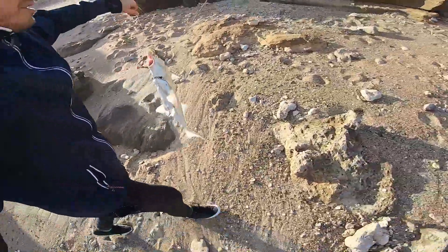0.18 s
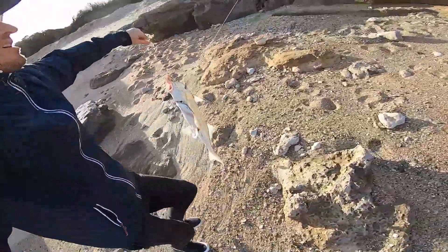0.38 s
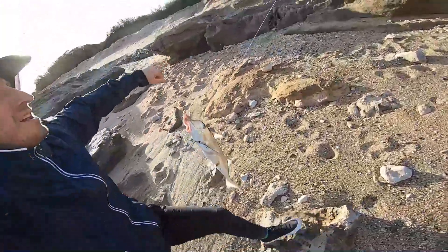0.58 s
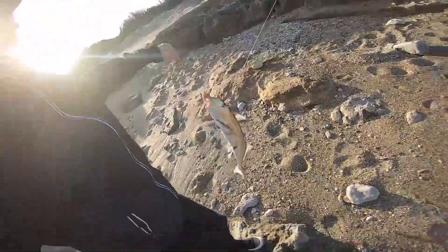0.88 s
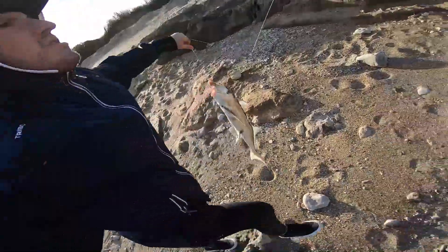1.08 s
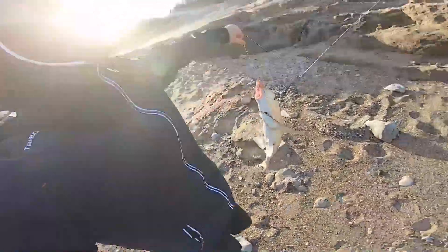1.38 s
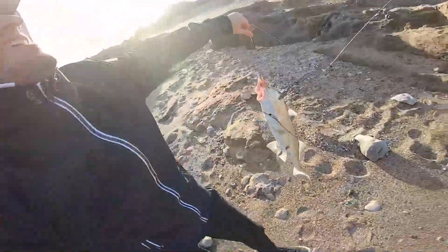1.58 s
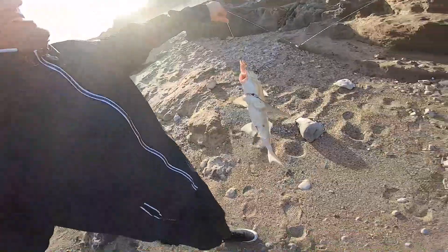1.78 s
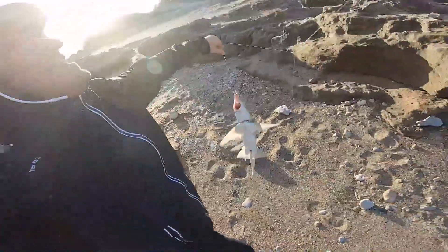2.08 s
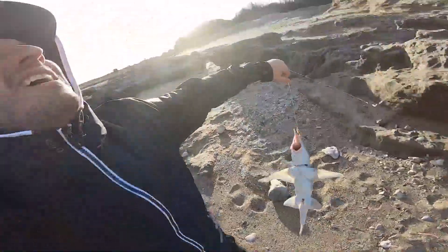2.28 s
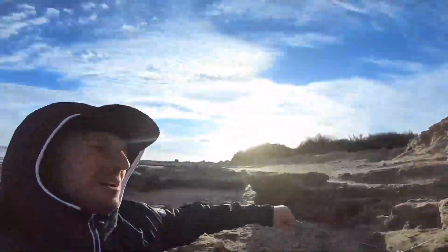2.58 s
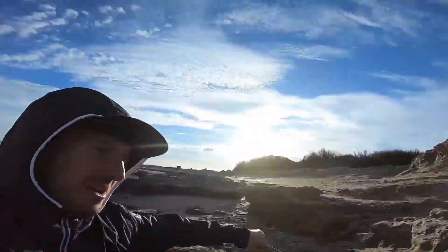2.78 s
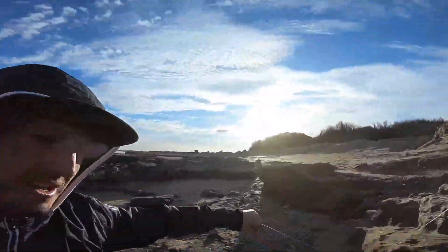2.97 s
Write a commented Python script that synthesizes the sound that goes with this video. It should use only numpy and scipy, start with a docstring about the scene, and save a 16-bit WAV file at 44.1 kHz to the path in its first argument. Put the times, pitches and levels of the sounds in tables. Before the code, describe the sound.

Close, boxy handling knocks and deep thumps of a camera on a pole dominate, mono and slightly overloaded. A wind buffet opens; from 0.2 s knocks and rubbing build to a heavy boom at 0.8. It eases around 1.0-1.5, then a dense, loud cluster rattles at 1.55-2.15 with brief gravel crunches. More clunks follow at 2.4-2.8, with a gust near 2.8, then a faint low ring fades into weak wind and surf hiss.

```python
"""Knocks and thumps travel through the casing and pole of a small camera that a walker holds in gusty wind.
Knocks drive the casing's resonances with short noise bursts; thumps are decaying low tones of the pole.
Wind is patchy low noise over a rumble; the rubbing grip and the gravel are grain trains that ring resonances.
Bright ticks give the treble edge of handling knocks, distant surf hisses as faint noise and a low ring
lingers near the end."""
import sys
import numpy as np
from scipy import signal
from scipy.io import wavfile

SR = 44100
rng = np.random.default_rng(int(sys.argv[2]) if len(sys.argv) > 2 else 0)


def put_to_file(sound):
    """Save the sound as 16-bit audio at rate SR, in the file named by the first command-line argument."""
    columns = np.atleast_2d(sound).T  # one column per channel
    safe = np.clip(columns, -1, 1)
    whole_steps = np.round(safe * 32767)
    wavfile.write(sys.argv[1], SR, whole_steps.astype(np.int16))


N = 138915

# Resonant modes of the casing. Each row: frequency in Hz, bandwidth in Hz, relative level in dB.
CASING = [(425.4, 38, 2.5), (673, 78, 0.5), (837, 77, 2), (959, 89.5, 1), (1200, 105, -3), (1442, 46, -6),
          (1630, 46, -8), (1952, 173, -12.5), (2210, 490, -24.5), (3100, 30, -22.5), (3950, 27, -21.5),
          (4790, 97, -24)]


def from_db(db):
    """Amplitude ratio: 20 dB is a factor of ten."""
    return 10 ** (np.asarray(db) / 20)


def rms_one(x):
    """Normalisation: scale a signal to unit rms."""
    return x / np.sqrt(np.mean(x ** 2) + 1e-20)


def in_time(rows):
    """Envelope: linear interpolation of (seconds, value) rows at every sample."""
    return np.interp(np.arange(N) / SR, *np.transpose(rows))


def drift(rate_hz):
    """Low-passed noise: two equal poles at rate_hz give a slow random curve of unit rms."""
    step = 40  # computed at every 40th sample, then interpolated
    settling = 2000
    pole = np.exp(-2 * np.pi * rate_hz * step / SR)
    noise = rng.standard_normal(N // step + settling + 2)
    slow = signal.lfilter([1], [1, -2 * pole, pole * pole], noise)[settling:]
    return np.interp(np.arange(N) / step, np.arange(len(slow)), rms_one(slow))


def band_pass(x, low_hz, high_hz):
    """Band limiting: a Butterworth filter passes one range of frequencies."""
    return signal.sosfilt(signal.butter(2, [low_hz, high_hz], "band", fs=SR, output="sos"), x)


def coloured(sources, spectrum, patchy_db):
    """Spectral shaping: bands up to half an octave wide, with shared and separate flicker; unit rms."""
    hz_points, db_points = np.transpose(spectrum)
    octaves = np.log2(hz_points[-1] / hz_points[0])
    edges = np.geomspace(hz_points[0], hz_points[-1], int(2 * octaves) + 2)
    out, together = 0, drift(5.7)
    for k, (low, high) in enumerate(zip(edges, edges[1:])):
        band = band_pass(sources[k % 2], low, high)  # neighbouring bands alternate sources
        level_db = np.interp(np.log(low * high) / 2, np.log(hz_points), db_points)
        out = out + band * from_db(level_db + patchy_db * (together + drift(18)))
    return rms_one(out)


def resonance(x, hz, width_hz):
    """Damped oscillator: a two-pole resonance with a gain of about 1 at its peak."""
    r = np.exp(-np.pi * width_hz / SR)
    feedforward = (1 - r * r) / 2 * np.array([1, 0, -1])
    feedback = [1, -2 * r * np.cos(2 * np.pi * hz / SR), r * r]
    return signal.lfilter(feedforward, feedback, x + 1e-18)


def modes(x, table, offsets_db=None):
    """Modal superposition: parallel resonances of alternating sign; one dB offset or curve per mode."""
    offsets_db = np.zeros(len(table)) if offsets_db is None else offsets_db
    out = 0
    for k, ((hz, width_hz, db), offset_db) in enumerate(zip(table, offsets_db)):
        out = out + (-1) ** k * from_db(db + offset_db) * resonance(x, hz, width_hz)
    return out


def flicker(table):
    """Varying excitation: each mode comes and goes as the contact shifts; one dB curve per mode."""
    spread_db, rate_hz = 3, 8.0
    return [spread_db * drift(rate_hz) for _ in table]


def grains(per_s, spread_db, clump_db):
    """Random impulse train: clicks of uneven size whose rate wanders around per_s, so that they clump."""
    born = rng.random(N) < per_s / SR * from_db(clump_db * drift(25.0))
    size_db = spread_db * np.minimum(rng.exponential(1, N), 4)
    return born * from_db(size_db) * rng.choice([-1, 1], N)


def bursts(moments, fades_ms, tail_db, size):
    """Transient excitation: noise swells and dies about each moment; yields (start, burst, spare draws)."""
    lead_s = 0.001485  # delay added to every moment
    rise_share, tail_s = 0.48, 0.02  # rise time as a share of the fade; time constant of the tail
    t = np.arange(SR // 8) / SR - .02
    noises = rng.standard_normal((len(moments), len(t) + size))
    for s, fade_ms, chance in zip(moments, fades_ms, noises):
        fade = max(fade_ms, .5) / 1000
        rise = np.exp(np.minimum(t, 0) / (fade * rise_share))
        fall = np.exp(-t / fade) + from_db(tail_db) * np.exp(-t / tail_s)
        shape = np.where(t < 0, rise, fall)
        start = max(int((s + lead_s + t[0]) * SR), 0)
        yield start, chance[:len(t)] * shape, chance[len(t):]


def wind():
    """Turbulent pressure fluctuation: patchy low noise at the microphone over a deeper rumble."""
    # Buffeting. Each row: time in seconds, rms level in dB.
    buffet_level = [(0, -13.5), (.1, -43), (.28, -26), (.5, -21.5), (.78, -20.5), (.95, -26), (1.17, -38),
                    (1.22, -30), (1.5, -25.5), (1.54, -32.5), (1.75, -23.5), (2.05, -26), (2.11, -29.5),
                    (2.36, -36), (2.58, -21), (2.67, -40.5), (2.8, -16), (2.94, -44), (3.15, -36)]
    # Buffeting spectrum. Each row: frequency in Hz, relative density in dB per Hz.
    buffet_colour = [(60, -2), (90, 1), (128, 2.5), (180, -3), (240, 3.5), (330, -23.5), (450, -22.5),
                     (650, -17)]
    # Deepest part of the wind. Each row: time in seconds, rms level in dB.
    rumble_level = [(0, -38), (.17, -34.5), (.26, -27.5), (.8, -34), (1.18, -43.5), (1.8, -24), (2.2, -32),
                    (2.85, -29.5), (2.95, -43.5), (3.15, -29)]
    buffet = coloured(rng.standard_normal((2, N)), buffet_colour, patchy_db=3)
    rumble = rms_one(band_pass(rng.standard_normal(N), 28.0, 65.0))
    return from_db(in_time(buffet_level)) * buffet + from_db(in_time(rumble_level)) * rumble


def rub():
    """Stick-slip friction: dense slips of the grip give a broad scrape and ring the casing."""
    # Rubbing carried through the casing. Each row: time in seconds, rms level in dB.
    rub_level = [(0, -48), (.1, -38.5), (.23, -30.5), (.47, -22), (.6, -28.5), (.72, -25.5), (.83, -23.5),
                 (.9, -34.5), (1.07, -46.5), (1.18, -45.5), (1.21, -41), (1.35, -37.5), (1.5, -28),
                 (1.53, -49), (1.72, -30.5), (1.81, -50.5), (1.87, -30.5), (2.0, -30), (2.11, -64.5),
                 (2.16, -29.5), (2.24, -50), (2.39, -38), (2.48, -36), (2.5, -34.5), (2.56, -28),
                 (2.62, -50), (2.68, -48.5), (2.73, -27.5), (2.8, -35), (2.87, -53), (3.15, -55.5)]
    # Spectrum of the scrape. Each row: frequency in Hz, relative density in dB per Hz.
    scrape_colour = [(200, 16), (1000, -2), (2000, -7), (2800, -50.5), (4700, -30.5), (8300, -48.5),
                     (10500, -64)]
    ring_db = 3  # ring relative to scrape
    slips = grains(per_s=900, spread_db=2.5, clump_db=5)
    ring = from_db(ring_db) * rms_one(modes(slips, CASING, flicker(CASING)))
    scrape = coloured([slips, slips], scrape_colour, patchy_db=1.0)
    return from_db(in_time(rub_level)) * rms_one(scrape + ring)


def crunch():
    """Granular contact: many small impacts of gravel under the shoes ring in a few bands."""
    # Strength of the crunching. Each row: time in seconds, rms level in dB.
    crunch_level = [(0, -57), (.35, -45.5), (.75, -51.5), (1.05, -60.5), (1.15, -54), (1.35, -50),
                    (1.55, -42.5), (1.58, -34), (1.62, -47), (1.65, -36), (1.74, -50), (1.8, -63),
                    (2.12, -69), (2.15, -42.5), (2.31, -53), (2.335, -38), (2.39, -38), (2.42, -50),
                    (2.5, -59), (2.62, -79), (3.15, -60)]
    # Resonances of the gravel. Each row: frequency in Hz, bandwidth in Hz, relative level in dB.
    gravel_peaks = [(1580, 210, 2), (2340, 86, 5.5), (2426, 130, 6.5), (2854, 360, -4), (3270, 64, -1),
                    (4380, 314, -5.5), (5150, 100, -7.5), (6170, 510, -19)]
    impacts = grains(per_s=7000, spread_db=3.0, clump_db=2)
    ring = modes(impacts, gravel_peaks, flicker(gravel_peaks))
    return from_db(in_time(crunch_level)) * rms_one(ring)


def surf():
    """Broadband noise radiation: distant surf is a faint, coloured, slightly flickering hiss."""
    # Spectrum of the surf. Each row: frequency in Hz, relative density in dB per Hz.
    surf_colour = [(250, 9), (400, -13.5), (900, 5.5), (1600, -36), (2600, -42), (3800, -28.5), (6200, -18),
                   (7500, -53.5), (10000, -50)]
    level_db = -57.5
    return from_db(level_db) * coloured(rng.standard_normal((2, N)), surf_colour, patchy_db=1.0)


def ticks():
    """Impact excitation: short bursts ring high modes at random levels, the treble edge of handling knocks."""
    # Bright ticks. Each row: moment in seconds, peak level in dB.
    tick_rows = np.array([(0.2203, -30), (0.294, -33), (0.3465, -30.5), (0.453, -28.5), (0.505, -34.5),
                          (0.698, -32), (0.738, -26.5), (0.774, -34.5), (0.8575, -16.5), (1.2127, -36.5),
                          (1.2655, -34.5), (1.4876, -32), (1.5636, -30.5), (1.665, -24), (1.704, -27),
                          (1.719, -24.5), (1.8517, -35.5), (1.8617, -27), (1.9038, -27), (1.9496, -26),
                          (1.9859, -36), (2.1354, -29.5), (2.2494, -35.5), (2.406, -25.5), (2.5166, -21),
                          (2.5516, -28), (2.7152, -29.5), (2.7728, -32.5), (2.7824, -35.5), (2.825, -38)])
    # High modes of the ticks. Each row: frequency in Hz, bandwidth in Hz, relative level in dB.
    tick_modes = [(2120, 353, 8), (3150, 560, -2), (4420, 570, -2.5), (6730, 1680, -9.5), (7550, 1200, -14)]
    fade_ms, tail_db, scatter_db = 2.3, -20, 2  # scatter: random spread of each mode's level
    out = np.zeros(N + SR)
    events = bursts(tick_rows[:, 0], [fade_ms] * len(tick_rows), tail_db, size=len(tick_modes))
    for db, (i, burst, draw) in zip(tick_rows[:, 1], events):
        tick = modes(burst, tick_modes, scatter_db * draw)
        out[i:i + len(burst)] += from_db(db) * tick / np.abs(tick).max()
    return out[:N]


def knocks():
    """Forced modal vibration: a short grind with one sharp contact drives the casing and pushes the pole."""
    # Knocks. Each row: moment in seconds, peak level of the casing sound in dB before the low-pass,
    # centre in Hz, peak of the pole's push relative to the casing in dB, fade in ms (0.5 at least).
    knock_rows = np.array([(0.222, -16.5, 1050, -25, 3.0), (0.307, -16, 1040, -0.5, 5.8),
                           (0.349, -14, 1400, 2.5, 3.8), (0.411, -38, 1010, -12.5, 3.4),
                           (0.449, -15, 790, 3, 8.1), (0.505, -10, 990, -3.5, 6.6),
                           (0.611, -16.5, 1010, -3.5, 11), (0.654, -28, 950, 3, 4),
                           (0.778, -19.5, 900, -11, 4), (0.857, -12, 810, -1.5, 0.92),
                           (0.919, -20, 840, -13, 1.5), (0.978, -26.5, 830, 4, 1),
                           (1.204, -24, 860, -16, 7), (1.326, -19.5, 614, -5, 2),
                           (1.407, -18.5, 1230, -2, 4.6), (1.489, -20, 790, -1, 2.3),
                           (1.566, -15.5, 880, -2.5, 1.1), (1.664, -7, 1017, -3, 3.8),
                           (1.706, -19, 970, 2, 1.5), (1.733, -19, 990, 7, 4),
                           (1.764, -14.5, 920, -16, 2.8), (1.832, -32, 830, -9, 2.4),
                           (1.854, -17, 1080, 5, 1.1), (1.866, -12, 646, -8.5, 3.1),
                           (1.904, -10.5, 1200, -21.5, 1.5), (1.91, -19.5, 1300, -6, 1),
                           (1.951, -7, 1100, -2.5, 2.6), (1.986, -10, 1250, 3.5, 4.5),
                           (2.136, -14.5, 1080, 10, 4.8), (2.156, -11, 1080, -18, 1.3),
                           (2.404, -17, 800, 5, 0.61), (2.454, -6.5, 1230, -4, 11),
                           (2.523, -14, 1050, 1.5, 3.6), (2.538, -16, 810, -1, 3.5),
                           (2.545, -11, 950, -3, 2.7), (2.561, -24, 1100, 12.5, 2.3),
                           (2.695, -26, 1130, -28, 4.7), (2.714, -11.5, 1115, -1, 5.1),
                           (2.738, -15, 800, 8, 0.43), (2.776, -15, 995, 0, 4.7), (2.822, -18.5, 830, 8, 8)])
    # Low modes of the pole. Each row: frequency in Hz, bandwidth in Hz, relative level in dB.
    pole_modes = [(122, 15, -1.5), (188, 67, 1), (241.5, 40, 2.5), (321, 27, -4.5), (446, 79, -11.5)]
    scatter_db, focus_db_per_octave = 7.5, 12.5  # chance level of a mode; its loss away from the centre
    snap_db, tail_db = 2, -23.5  # sharp contact relative to the grind; tail of the grind
    thud_db, thud_width = -4.5, 0.79  # broad thud relative to the ring; width as a share of the centre
    contact_hz = 2420  # low-pass corner
    out, casing_hz = np.zeros(N + SR), np.transpose(CASING)[0]
    events = bursts(knock_rows[:, 0], knock_rows[:, -1], tail_db, size=len(CASING))
    for (_, db, hz, push_db, _), (i, burst, draw) in zip(knock_rows, events):
        contact = 1. * (np.arange(len(burst)) == SR // 50)  # impulse where the swell turns to decay
        force = burst / np.linalg.norm(burst) - from_db(snap_db) * contact
        focus_db = -focus_db_per_octave * np.abs(np.log2(casing_hz / hz))
        ring = modes(force, CASING, scatter_db * draw + focus_db)
        thud = resonance(resonance(force, hz, thud_width * hz), hz, 2 * thud_width * hz)
        body = ring / np.abs(ring).max() + from_db(thud_db) * thud / np.abs(thud).max()
        push = modes(-contact, pole_modes)
        knock = body / np.abs(body).max() + from_db(push_db) * push / np.abs(push).max()
        out[i:i + len(burst)] += from_db(db) * knock
    return signal.sosfilt(signal.butter(2, contact_hz, fs=SR, output="sos"), out[:N])


def thumps():
    """Free damped vibration: each jolt sets the pole booming as an unsteady low tone with a weak overtone."""
    # Jolts. Each row: start in seconds, peak level of the main tone in dB,
    # mean pitch in Hz, 60 dB decay time in seconds.
    thump_rows = [(0.234, -19, 137.9, 0.4), (0.288, -20.5, 78.7, 0.52), (0.347, -13, 147.2, 0.13),
                  (0.449, -11, 132, 0.13), (0.512, -11.5, 166, 0.19), (0.673, -12, 195, 0.072),
                  (0.805, -4, 163.5, 0.2), (1.198, -24, 217.7, 0.2), (1.318, -23, 155.8, 0.69),
                  (1.566, -16, 122.3, 0.16), (1.647, -12.5, 120, 0.057), (1.669, -9, 109.5, 0.31),
                  (1.709, -8.5, 159.1, 0.25), (1.764, -12, 175.7, 0.11), (1.819, -10.5, 83, 0.034),
                  (1.862, -1.5, 114.6, 0.055), (1.901, -5.5, 192, 0.039), (1.922, -13.5, 122, 0.15),
                  (1.964, -9.5, 115, 0.15), (1.99, -10.5, 125.8, 0.21), (2.132, -13, 149.8, 0.26),
                  (2.16, -21.5, 164.3, 0.3), (2.401, -15, 134, 0.088), (2.45, -15.5, 145.3, 0.46),
                  (2.516, -10, 95, 0.12), (2.568, -16, 148.2, 0.16), (2.727, -14, 258.4, 0.22),
                  (2.747, -7.5, 109.2, 0.12), (2.829, -25, 118.8, 0.3)]
    rise_s, wobble, overtone_db = 0.0038, 0.087, -15.5  # wobble: rms share of the pitch
    out, t = np.zeros(N + SR), np.arange(SR // 3) / SR
    sway = np.resize(drift(22.1), N + SR)
    for (s, db, hz, t60), start_turn in zip(thump_rows, rng.random(len(thump_rows))):
        i = int(s * SR)
        turns = np.cumsum(hz * (1 + wobble * sway[i:i + len(t)])) / SR + start_turn
        shape = (1 - np.exp(-t / rise_s)) * from_db(-60 * t / max(t60, .02))
        overtone = from_db(overtone_db) * np.sin(2 * np.pi * 2.3 * turns)
        tone = np.sin(2 * np.pi * turns) + overtone
        out[i:i + len(t)] += from_db(db) * shape / shape.max() * tone
    return out[:N]


def lingering_ring():
    """Exponential decay: one faint low sine lingers after the last jolt."""
    # The ring: start in seconds, initial level in dB, frequency in Hz, 60 dB decay time in seconds.
    s, db, hz, t60 = (2.86, -28, 328.5, 0.23)
    out, t = np.zeros(N + SR), np.arange(SR // 3) / SR
    i = int(s * SR)
    out[i:i + len(t)] = from_db(db - 60 * t / t60) * np.sin(2 * np.pi * hz * t)
    return out[:N]


def scene():
    """Linear superposition: all sources add at one microphone."""
    air_and_ground = wind() + rub() + crunch() + surf()
    impacts = ticks() + knocks() + thumps() + lingering_ring()
    return (air_and_ground + impacts)[None]


def record(dry):
    """Saturation and band limiting: peaks are rounded, then a steep low-pass cuts the top."""
    ceiling, stopband_hz, stopband_loss_db = .8, 11284, 24
    rounded = ceiling * np.tanh(dry / ceiling)
    low_pass = signal.cheby2(5, stopband_loss_db, stopband_hz, fs=SR, output="sos")
    return signal.sosfilt(low_pass, rounded)


dry = scene()
out = record(dry)
put_to_file(out)
```